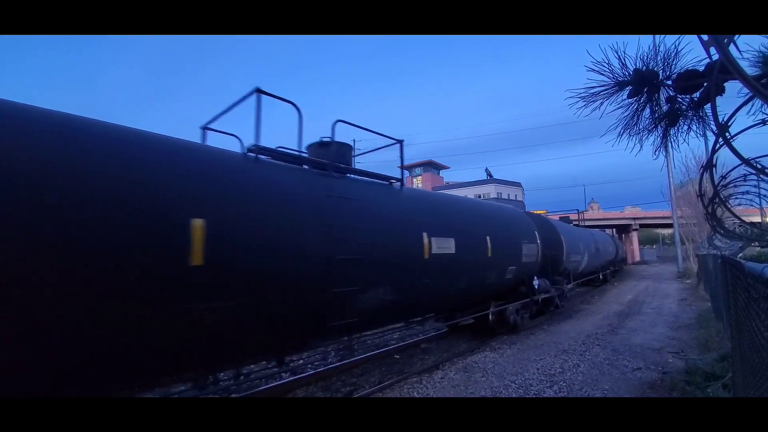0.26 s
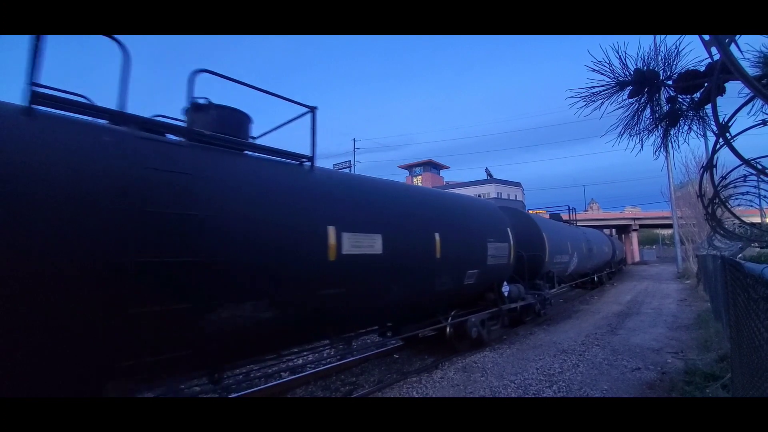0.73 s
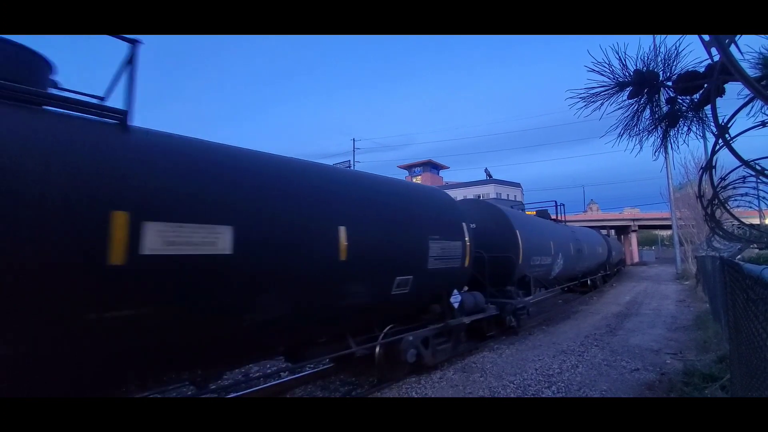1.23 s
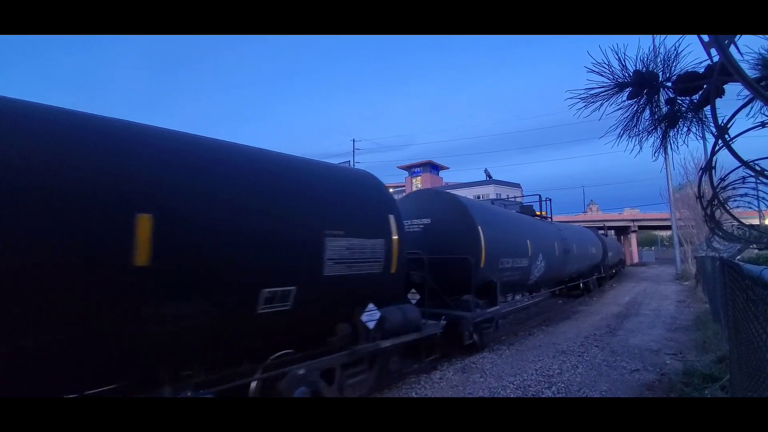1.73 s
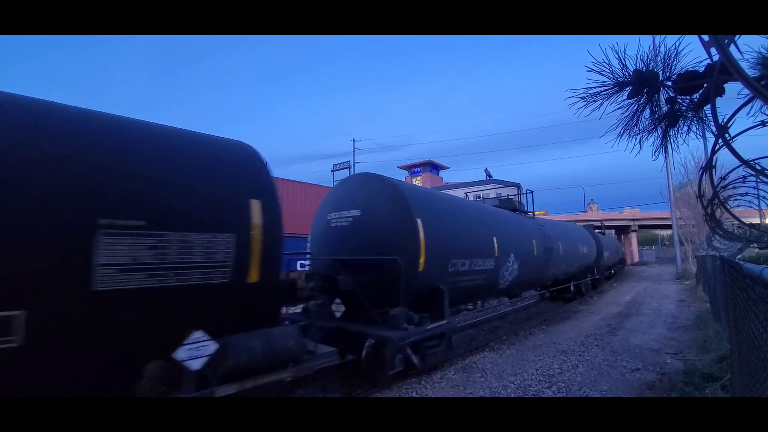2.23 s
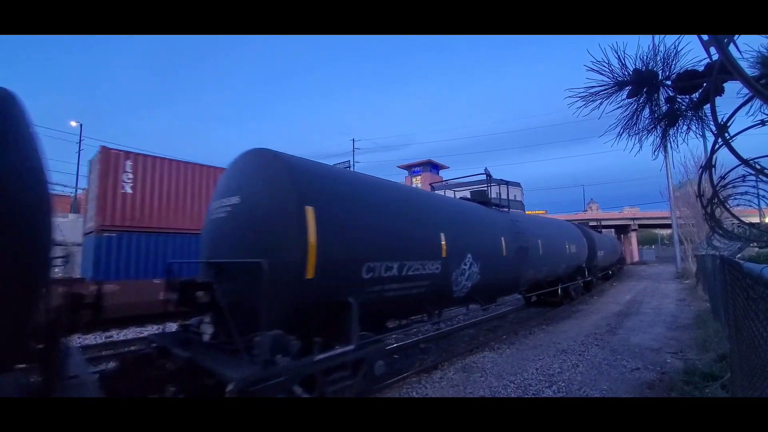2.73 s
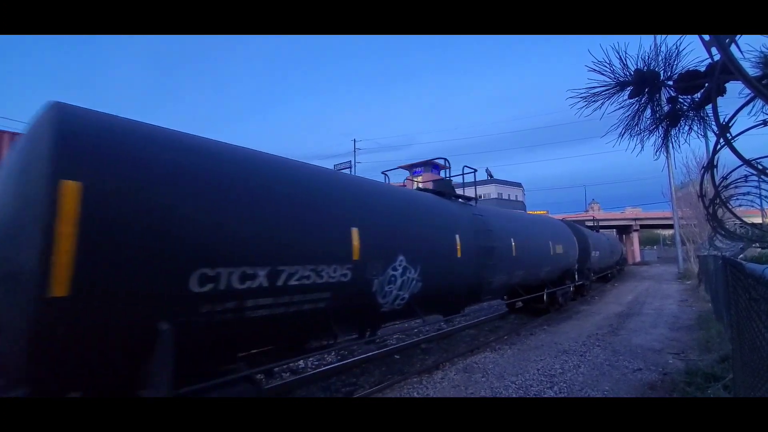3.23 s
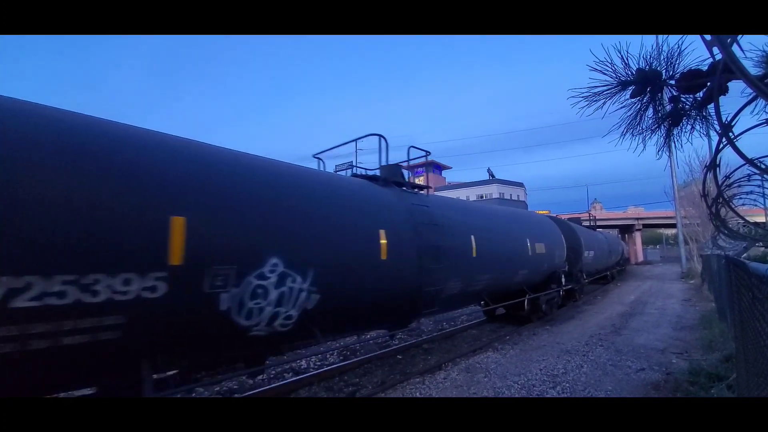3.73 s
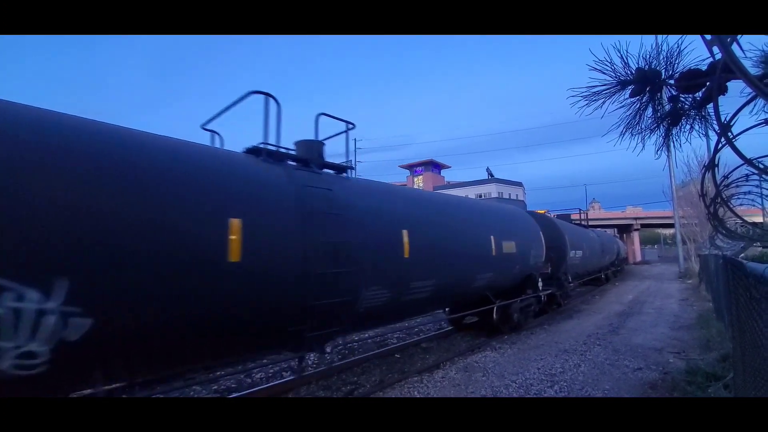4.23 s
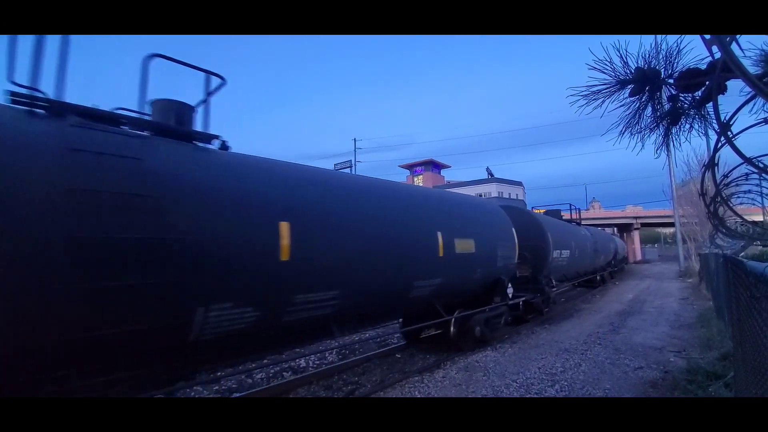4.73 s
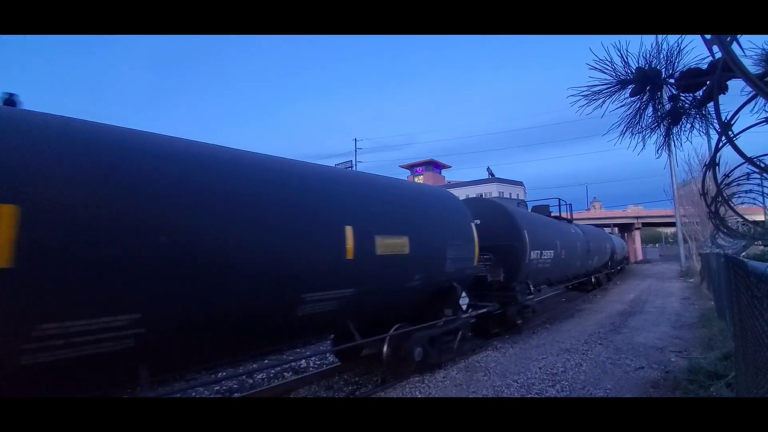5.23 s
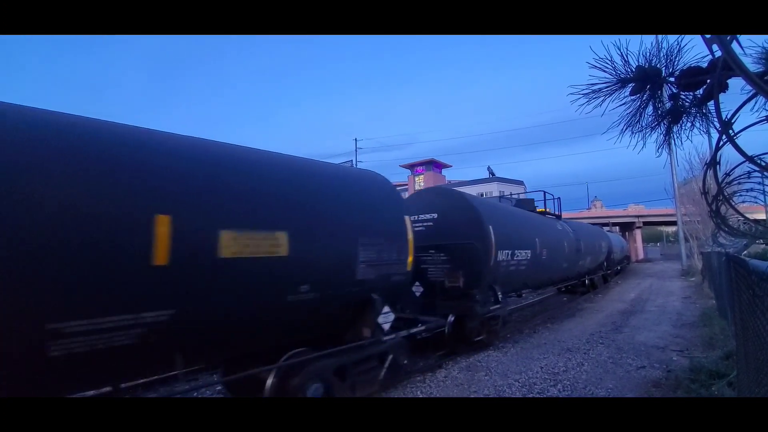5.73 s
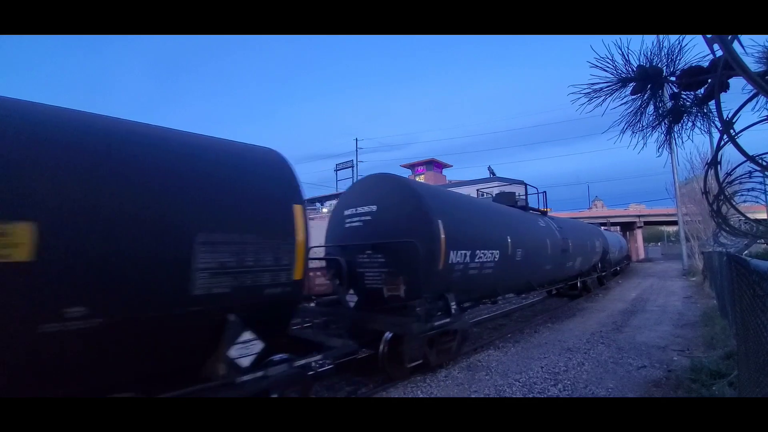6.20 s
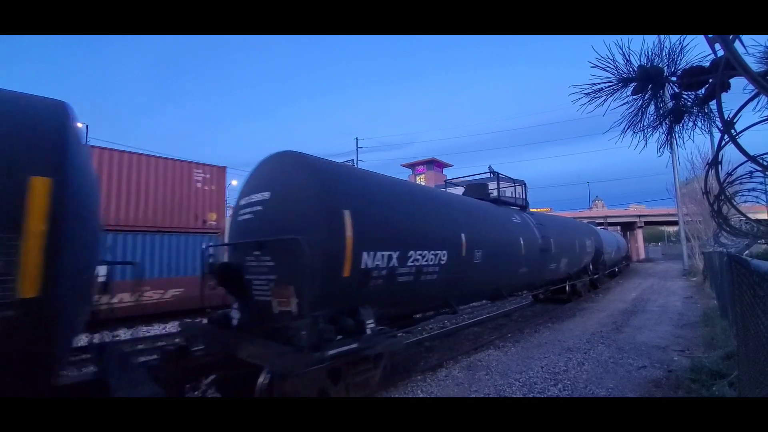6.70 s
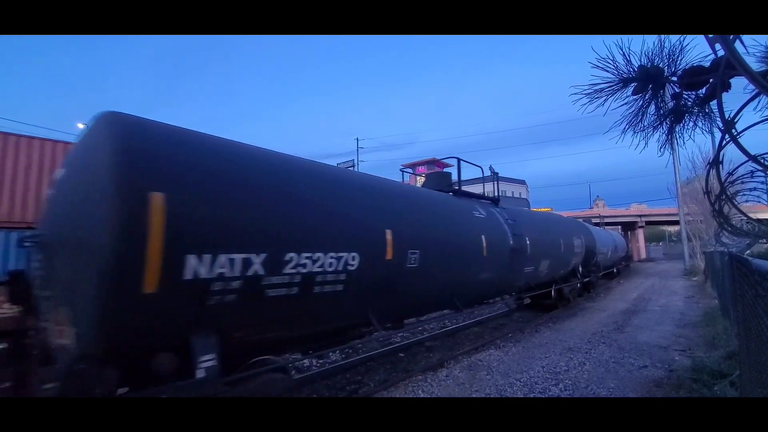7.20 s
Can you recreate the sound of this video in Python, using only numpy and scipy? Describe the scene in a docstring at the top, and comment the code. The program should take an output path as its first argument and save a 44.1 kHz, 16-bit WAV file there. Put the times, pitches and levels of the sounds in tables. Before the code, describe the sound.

Outdoors, a few metres from the track, a small stereo microphone pair hears slow, heavy tank cars rolling by without a break. It opens with low ground rumble, moderate airy steel hiss and faint wheel ringing. Thudding surges of rumble gather around 0.8-1.1 s and again near 2 s. The hiss and rail roar swell to about 1.7 s, while a very thin, extremely high flange squeal wavers and flutters from about 1 to 3.5 s, broken by tiny dips. Dull, short knocks in the running gear land irregularly, notably near 1.1, 1.3 and 2.7 s, with a softer cluster from 3.4 to 4.4 s. The sound eases around 4-4.7 s, then a second bright swell peaks near 5.4 s with a knock and rumble surge, staying strong past 6 s. Thin glassy wheel notes, sagging slightly, shimmer through the end at 7.5 s, rolling on.

```python
"""Slow tank cars at the trackside

A slow train of tank cars rolls past, 5 m from a small pair of microphones. Shaped noise makes the ground
rumble, car body boom, rail roar and steel hiss, which swell and fade as the trucks go by.
Thin wavering sines make the wheels ring on notes that sag in pitch as they pass, and one flange squeal
very high; knocks in the running gear are short rings of a few low modes."""
import sys
import numpy as np
from scipy import signal
from scipy.fft import rfft, irfft, next_fast_len
from scipy.io import wavfile
from scipy.ndimage import uniform_filter1d

SR = 44100
rng = np.random.default_rng(int(sys.argv[2]) if len(sys.argv) > 2 else 0)


def generate_wav(signal):
    """Clip the signal to [-1, 1] and save it as 16-bit WAV at the path in sys.argv[1]."""
    frames = np.transpose(np.atleast_2d(signal))
    scaled = np.clip(frames, -1, 1) * 32767
    pcm = np.round(scaled).astype(np.int16)
    wavfile.write(sys.argv[1], SR, pcm)


def ratio_of_db(decibels):
    """Turn decibels (scalar or array-like) into linear amplitude factors; 0 dB maps to 1."""
    return 10 ** (np.asarray(decibels, float) / 20)


N = 328841  # samples
FRAME, HOP = 2048, 512  # samples, short-time spectra
HZ = np.fft.rfftfreq(FRAME, 1 / SR)[:, None]
TIME = np.arange(N // HOP + 5) * HOP / SR
SPEED, DISTANCE = 4.6, 5.0  # m/s, m from the microphones to the track
LEAD = 20  # samples the left port leads in the rolling noise; half as many in rumble and knocks

# slow levels of the low layers: time_s, ground_rumble_db, body_boom_db, rail_roar_db
LOW = [(0.0, -34.5, -40, -48), (0.52, -34, -41.5, -47), (0.6, -32, -36.5, -45.5), (0.95, -29, -36, -45.5),
       (1.24, -24, -30.5, -40.5), (1.56, -24, -35.5, -39), (1.68, -29, -35.5, -43.5),
       (2.14, -30, -34.5, -42.5), (2.43, -33, -41, -46), (2.47, -33, -34.5, -43),
       (3.53, -36.5, -43.5, -49.5), (3.97, -35.5, -36, -46.5), (4.03, -35, -40, -49),
       (4.73, -33.5, -40.5, -50.5), (5.27, -35, -37, -40.5), (5.6, -34.5, -41.5, -38.5),
       (5.85, -36, -39, -43.5), (6.15, -36, -42.5, -46.5), (6.65, -41, -45.5, -52),
       (6.95, -38.5, -39.5, -49.5), (7.08, -34.5, -37, -48), (7.46, -40, -44.5, -54.5)]
# slow levels of the hiss: time_s, wheel_roar_db, tread_hiss_db, flange_hiss_db, left_over_right_db
HIGH = [(0.0, -41.5, -41, -35, 1), (0.23, -39.5, -40.5, -32, 1.5), (0.35, -37.5, -35, -33, 3.5),
        (0.66, -38.5, -37.5, -31.5, 1), (0.79, -35, -31.5, -29, 1.5), (1.26, -32.5, -29, -27, 3.5),
        (1.7, -29.5, -24.5, -25.5, 3), (2.24, -34, -30, -29.5, 1.5), (2.62, -32, -30.5, -25.5, 4),
        (2.78, -33.5, -29, -30, -1.5), (2.99, -35, -32.5, -23.5, 2.5), (3.11, -33.5, -33, -29.5, 1.5),
        (3.32, -37, -32, -28, 1.5), (3.65, -37.5, -32.5, -26, 3), (4.28, -38, -33.5, -33, 0),
        (4.67, -41, -38, -34, 2.5), (4.87, -35, -32, -30.5, 2.5), (5.07, -30, -29.5, -28.5, 3),
        (5.13, -30, -29, -26, 3.5), (5.38, -26.5, -24.5, -26, 3), (5.81, -29, -29.5, -26, 4),
        (6.11, -29, -27, -27, 3.5), (6.73, -35, -31.5, -28, 5), (6.91, -30, -28, -30, 3),
        (7.46, -36.5, -31, -26.5, 1.5)]
# when each truck passes the microphones: time_s
ABREAST = [-.5, 2.3, 3.4, 6.2, 7.3]
# lean of the microphone pair over pitch: pitch_hz, left_over_right_db
TILT = [(100, -1.5), (400, 1.4), (1800, 0), (3200, -1.5), (6500, 2.5), (7500, -0.5), (8700, -5),
        (10500, 4.5), (12500, 0.5), (15000, 13.5)]


def read(points, hz=HZ):
    """A spectrum table on a log pitch scale, constant beyond its ends."""
    f, value = np.transpose(points)
    return np.interp(np.log(hz + 1), np.log(f + 1), value)


def curves(rows):
    """The columns of a time table at each frame."""
    s, *columns = np.transpose(rows)
    return [np.interp(TIME, s, c) for c in columns]


def drift(bins, frames):
    """Random field over frequency and time in patches of the given size, rms 1."""
    field = rng.standard_normal((len(TIME), len(HZ))).T
    field = uniform_filter1d(field, max(round(bins), 1), 0)
    field = uniform_filter1d(field, max(round(frames), 1), 1)
    return field / field.std()


def doppler(abreast, t):
    """Pitch factor of a wheel that nears, passes and leaves."""
    ahead = SPEED * (abreast - t)  # m along the track
    return 1 + SPEED / 343 * ahead / np.hypot(ahead, DISTANCE)


def port_gains(hz):
    """Left and right gain of a sound that is unalike at the two ports."""
    return np.sqrt(2) * ratio_of_db(read(TILT, hz) * np.array([[.5], [-.5]]))


def waver(t, hz, width_hz, even):
    """A thin note at each port: a sine whose phase and size wander; even 1 keeps the size steady."""
    steps = np.arange(t[0], t[-1] + .02, .004)
    draws = rng.standard_normal((len(steps), 2, 2)).T
    a, b = uniform_filter1d(draws, max(round(250 / width_hz), 1), 2)
    z = uniform_filter1d(a, 3) + 1j * uniform_filter1d(b, 3)
    z = z / (abs(z) + 1e-9) ** even
    z /= np.sqrt(np.mean(abs(z) ** 2))
    z = np.array([np.interp(t, steps, port) for port in z])
    carrier = np.exp(2j * np.pi * np.cumsum(hz) / SR)
    return np.sqrt(2) * (z * carrier).real


def rolling():
    """Power of five bands of rolling noise; the treble flickers at random in wide patches."""
    # colour of each band: pitch_hz, density_db (relative, per Hz)
    body = [(82, -8), (140, -1.5), (200, -2), (263, -7), (330, -5.5), (366, -5), (420, -9), (520, -14.5),
            (680, -25.5), (1140, -120)]
    rail = [(280, -46), (480, -1), (651, -0.5), (905, -6), (981, -4.5), (1320, -8), (1500, -7), (1950, -12),
            (3300, -120)]
    wheel = [(790, -39), (1400, -14.5), (1780, -1.5), (2760, 4), (4220, 3), (4570, 1.5), (5200, 0.5),
             (6760, -15), (11400, -120)]
    tread = [(2820, -23), (4800, -3.5), (6080, -1.5), (6370, -3), (7900, -3.5), (9410, -3.5), (10300, -7.5),
             (11300, -3), (12000, 1), (22000, -120)]
    flange = [(6350, -60), (10600, -38), (11600, -7), (12400, 0.5), (13300, 5), (14200, -1), (15000, 1),
              (15600, -0.5)]
    # broad humps and dips that stay put: pitch_hz, width_hz, gain_db
    humps = [(2770, 85, 1), (3180, 150, -3.5), (3450, 50, -2), (3700, 120, -4), (3980, 80, 1.5),
             (4270, 110, -5), (4520, 60, 1), (4730, 90, -2.5), (5060, 180, -5), (5750, 90, -2.5),
             (6500, 150, 2), (7300, 120, -4), (7680, 80, -3), (8150, 150, -6), (8870, 150, -4.5),
             (10000, 200, -1), (12600, 180, 0.5), (14880, 200, 4.5)]
    # the low edge of the wheel roar waxes and wanes: time_s, gain_db
    low_edge = [(0, 0.5), (1, -1), (1.8, -2.5), (2.5, -1.5), (3.4, 2), (4.2, 3), (4.8, 0.5), (5.7, -3),
                (6.6, 4), (7.46, -2)]
    edge_hz, edge_width_hz = 1850, 330

    shapes = [ratio_of_db(read(s)) ** 2 for s in (body, rail, wheel, tread, flange)]
    levels = curves(LOW)[1:] + curves(HIGH)[:3]
    power = sum(s / s.sum() * ratio_of_db(db) ** 2 for s, db in zip(shapes, levels))
    humps_db = sum(db * np.exp(-((HZ - hz) / width) ** 2) for hz, width, db in humps)
    edge_db = curves(low_edge)[0] * np.exp(-((HZ - edge_hz) / edge_width_hz) ** 2)
    treble_flicker = np.clip(HZ / 9000, 0, 1.2) * drift(bins=170, frames=2)
    broad_flicker = np.clip(HZ / 3000, 0, 1) * drift(bins=910, frames=6)
    # narrow resonances of the scraping steel come and go
    scrape = np.clip(HZ / 2000, 0, 1) * drift(bins=2, frames=16)
    fine_db = 2.3 * scrape + 1.74 * drift(bins=5, frames=5)
    flicker_db = fine_db + 0.9 * treble_flicker + 0.72 * broad_flicker
    return power * ratio_of_db(humps_db + edge_db + flicker_db) ** 2


def faint_notes(count):
    """Power gain on the rolling noise from many weak wheel modes that all trucks share."""
    ringing = np.zeros((len(HZ), len(TIME)))
    for hz in rng.uniform(1488.0, 15400, count):
        near = slice(int(hz * .98 * FRAME / SR) - 8, int(hz * 1.02 * FRAME / SR) + 8)
        for abreast in ABREAST:
            off_hz = HZ[near] - hz * doppler(abreast, TIME)
            shape = 1 / (1 + (off_hz / 11) ** 2) ** 2
            ringing[near] += shape / shape.sum(0) * np.exp(-((TIME - abreast) / 1.03) ** 2)
    return 1 + ringing * ratio_of_db(1.5 + 3.8 * drift(bins=2.4, frames=12)) ** 2  # they flare and fade unevenly


def stray_notes(count):
    """Lesser wheel notes that come by chance, each from the truck nearest at its middle."""
    range_hz, range_s, range_db = (2000, 15400), (.15, .9), (3, 8)  # pitch, length, strength
    at, pitch, length, strength = rng.random((count, 4)).T
    middle = at * N / SR
    half = np.interp(length ** 2, (0, 1), range_s) / 2  # squared: short notes are commoner
    truck = np.take(ABREAST, abs(middle[:, None] - ABREAST).argmin(1))
    return list(zip(middle - half, middle + half, np.interp(pitch, (0, 1), range_hz),
                    np.interp(strength, (0, 1), range_db), truck))


def wheels(power):
    """Ringing notes, listed and by chance, each driven by the rolling noise around its pitch."""
    # notes that stand out, grouped by the passing time that sets their glide (a far one makes the
    # pitch nearly steady): start_s, end_s, pitch_hz (ahead of the glide),
    # level_db (over one bin of the rolling noise, ahead of a 0.5 dB trim)
    rings = [
        [(0, 1.44, 6648, 10), (.05, .7, 4030, 6.5), (0, .5, 4580, 8.5), (.5, .78, 2050, 9), (0, .15, 5540, 9),
         (0, .25, 3030, 7), (.37, .93, 8034, 12), (0, .56, 13068, 9.5), (3.2, 4.7, 9785, 12),
         (3.62, 5.2, 15042, 10.5)],
        [(1.3, 1.9, 363, 0), (1, 2, 1790, 8.5), (1.2, 1.35, 2210, 8), (2.08, 2.28, 1250, 9.5),
         (1.98, 2.15, 6130, 9), (2.08, 2.28, 366, 5), (2.45, 3, 367, 2), (1.49, 3.07, 6525, 10),
         (2.5, 4.4, 7445, 10.5), (2.4, 2.9, 7720, 11), (2.4, 3.2, 7860, 9), (2.3, 2.6, 6070, 9.5),
         (2.79, 3.34, 12882, 10.5), (.9, 1.9, 14900, 9), (2.2, 2.9, 14850, 10), (3.25, 4.83, 6528, 9),
         (6.6, 7, 1625, 10)],
        [(3.05, 3.3, 4490, 11), (3.35, 4.1, 4500, 10.5), (3.7, 3.88, 968, 3), (2.4, 3.5, 3935, 8),
         (4.05, 4.25, 3950, 8), (3.2, 4.4, 5210, 7.5), (2.4, 4, 6850, 7.5), (3.6, 3.85, 2735, 7),
         (4, 4.5, 3330, 8), (2.37, 3.95, 8334, 13.5), (2.93, 4.5, 14850, 11), (3.1, 3.9, 14930, 9),
         (3.15, 4, 13740, 10), (3.1, 4.25, 12714, 12), (3.25, 4.05, 15480, 13), (2.04, 3.62, 14118, 7.5)],
        [(4.27, 5.85, 14844, 10.5), (5.1, 5.5, 1830, 10), (5.6, 6.05, 1800, 10), (6.3, 6.52, 1560, 11),
         (6.3, 6.5, 1750, 9), (6.25, 7.1, 3335, 9), (5.5, 6.9, 5450, 7.5), (6.3, 6.65, 2740, 9.5),
         (5.3, 6, 366, 2), (4.5, 5.4, 7400, 9.5), (6, 6.8, 7410, 11), (4.3, 5, 11900, 13),
         (4.4, 5.8, 12460, 11), (4.4, 5.6, 11230, 9), (4.7, 5.3, 4510, 10.5), (5.4, 5.95, 4515, 11),
         (5.1, 5.6, 2690, 8.5), (5.7, 5.9, 1585, 8), (5.62, 5.75, 3525, 13), (5.65, 5.85, 965, 2),
         (5.08, 5.22, 740, 2), (5.7, 6.5, 9335, 9), (5.2, 6, 12975, 8.5), (6, 6.8, 13870, 9),
         (6.45, 6.85, 12230, 11), (6.4, 6.9, 9850, 9.5), (6.4, 6.9, 7950, 9.5), (5.02, 6.04, 14166, 8.5),
         (5.11, 6.69, 8352, 11), (4.9, 5.7, 11676, 10), (5.76, 6.78, 15168, 9.5), (6.1, 6.3, 4000, 11),
         (6.75, 7.12, 3995, 14.5), (5.7, 6.4, 8405, 14), (6.4, 7.46, 8385, 12.5), (5.85, 6.87, 11975, 11),
         (6.04, 6.59, 6420, 11.5), (6.04, 7.43, 14874, 10.5), (6.13, 6.69, 14730, 10), (6.1, 6.87, 10840, 13),
         (6.3, 6.55, 2200, 10), (6.8, 7.4, 2200, 8)],
        [(6.07, 6.3, 4478, 16.5), (6.64, 6.9, 4490, 17.5), (6.95, 7.17, 4498, 15), (6.8, 7, 2700, 12),
         (6.95, 7.4, 3125, 9.5), (6.85, 7.46, 13278, 13), (7.15, 7.46, 1928, 13), (6.8, 7.46, 3815, 9),
         (7.1, 7.46, 6000, 9.5), (7.15, 7.46, 8950, 9.5), (6.9, 7.46, 15470, 10), (6.3, 6.45, 2610, 11),
         (7.06, 7.46, 13590, 13), (7, 7.46, 14700, 15.5)],
    ]
    out = np.zeros((2, N))
    listed = [(*note, abreast) for abreast, notes in zip(ABREAST, rings) for note in notes]
    for start, end, hz, db, abreast in listed + stray_notes(count=100):
        # .06 s more at each end for the fades
        at = np.arange(max(int((start - .06) * SR), 0), min(int((end + .06) * SR), N))
        t = at / SR
        k = round(hz * FRAME / SR)
        nearby = power[k - 8:k + 9].mean(0)
        drive = np.sqrt(np.interp(t, TIME, uniform_filter1d(nearby, size=15)))
        tone = waver(t, hz * doppler(abreast, t), 7 + .001 * hz, even=0.8)
        tone = tone[[0, 0]] if hz < 1000 else tone  # low notes are alike at both ports
        fade = signal.windows.tukey(len(t), .25)
        out[:, at] += tone * drive * fade * ratio_of_db(db - 0.5) * port_gains(hz)
    return out


def squeal():
    """One flange sings: through the air it sags in pitch, through the rail it holds; air has a noisy skirt."""
    # slow level: time_s, level_db (ahead of a 1 dB lift)
    squeal_level = [(0, -41), (.65, -45), (1, -30.5), (1.3, -22), (1.55, -26), (1.8, -29), (2.1, -25.5),
                    (2.35, -25), (2.52, -28), (2.65, -23.5), (2.78, -31.5), (2.95, -28.5), (3.15, -31.5),
                    (3.5, -35), (3.9, -42), (4.2, -46)]
    # place between the ports: time_s, left_over_right_db
    squeal_pan = [(0, 2), (1.3, -1), (1.5, 3), (2.3, 1.5), (2.5, 5), (2.66, 10), (2.9, 7), (3.1, 2),
                  (4.2, 11)]
    # brief dips in the squeal's level, and one brief rise: time_s, change_db
    dips = [(1.1, -9), (1.36, -6), (1.59, -5), (1.73, -16), (1.82, -9), (1.91, -7), (1.98, -14),
            (2.42, -12), (2.6, -13), (2.75, -5), (3.12, 5), (3.42, -8)]
    # part of the power that comes along the rail: time_s, share (0-1)
    rail_share = [(0, .5), (1.1, .4), (1.3, .6), (1.7, .45), (2, .05), (3.1, .03), (3.4, .6), (4.2, .6)]
    dip_s = 0.011  # half length of a dip

    t = np.arange(int(squeal_level[-1][0] * SR)) / SR
    share = np.interp(t, *np.transpose(rail_share))
    air_hz = 11942 * doppler(ABREAST[1], t)
    air = waver(t, air_hz, 26, even=0.8)  # echoes off the cars make it unalike at the ports
    rail = waver(t, 11938 + 0 * t, 28, even=0.65)
    skirt = sum(waver(t, air_hz + off_hz, 120, even=0) for off_hz in (-110, -30, 60))
    sound = np.sqrt(1 - share) * air + np.sqrt(share) * rail + ratio_of_db(-12.5) * skirt
    throb_db = 1.0 * waver(t, 11.3 + 0 * t, 21.0, even=0.15)[0]  # uneven throb at about 11.3 Hz
    sound *= ratio_of_db(np.interp(t, *np.transpose(squeal_level)) + throb_db + 1.0)
    sound *= ratio_of_db(sum(db * np.exp(-((t - s) / dip_s) ** 2) for s, db in dips))
    pan_db = np.interp(t, *np.transpose(squeal_pan))
    sound *= ratio_of_db(pan_db * np.array([[.5], [-.5]])) * np.sqrt(2)
    return np.pad(sound, ((0, 0), (0, N - len(t))))


def surges(t):
    """Amplitude of the rumble's surges: half a bell on either side of each peak, the fall slower."""
    # surges of the ground: time_s, peak_db
    surge_peaks = [(.3, -28.5), (.78, -21.5), (.87, -22), (1.05, -21), (1.11, -18), (1.33, -35), (1.6, -31),
                   (1.86, -23), (2.14, -22), (2.24, -25.5), (2.97, -28.5), (3.03, -26.5), (3.09, -28),
                   (3.23, -29), (3.63, -30), (4.15, -29), (5.19, -27.5), (5.35, -21.5), (5.86, -32),
                   (6.9, -38), (7.41, -30.5)]
    s, db = np.transpose(surge_peaks)[:, :, None]
    width = np.where(t < s, 0.014, 0.022)  # s, rise and fall
    return (ratio_of_db(db) * np.exp(-((t - s) / width) ** 2 / 2)).max(0)


def rumble():
    """The ground hums more evenly than plain noise, almost alike at both ports."""
    # colour of the rumble: pitch_hz, density_db (relative, per Hz)
    rumble_colour = [(12, -50), (20, -49), (55, -5), (75, -3), (94, -3.5), (141, -14), (170, -19),
                     (220, -20), (370, -120)]
    size = next_fast_len(N + LEAD)
    colour = ratio_of_db(read(rumble_colour, np.fft.rfftfreq(size, 1 / SR)))
    hum, other = signal.hilbert(irfft(rfft(rng.standard_normal((2, size))) * colour, size))
    hum = (hum / abs(hum) ** .55).real  # evens out the beats
    hum = irfft(rfft(hum) * (colour / (colour + 0.51)), size)  # back inside the band
    hum = hum / hum.std()
    other = ratio_of_db(-22.5) * other.real / other.real.std()  # the part that is opposite at the ports
    ports = np.array([(hum + other)[LEAD // 2:][:N], (hum - other)[:N]]) * ratio_of_db([[-.25], [.25]])
    t = np.arange(N) / SR
    lumps_db = 1.5 * waver(t, 14 + 0 * t, 30, even=0.95)[0]  # uneven lumps at about 14 Hz
    slow_db = np.interp(t, TIME, curves(LOW)[0]) + lumps_db
    return ports * np.maximum(ratio_of_db(slow_db), np.interp(t, TIME, surges(TIME)))


def knocks():
    """Dull knocks in the running gear: each rings the same few low modes, a little detuned."""
    # the knocks: time_s, peak_db (ahead of the pan gains), left_over_right_db
    knock_list = [(0.738, -44, -5), (0.812, -33, -3), (1.061, -27, 1.5), (1.334, -25, -4), (1.808, -49, 1),
                  (2.333, -33, 3), (2.644, -41, -11), (2.74, -23.5, 0), (2.999, -35, 0), (3.404, -31, 0.5),
                  (3.801, -33.5, 4), (3.923, -30, 4.5), (4.094, -32, 3), (4.146, -40, 0), (4.338, -34, -2),
                  (4.448, -37, 6), (5.18, -43, 8), (5.28, -26.5, 1), (7.052, -39, -2)]
    # modes of the running gear: pitch_hz (ahead of detuning), level_db, t60_s
    knock_modes = [(215, -4, 0.039), (333, 0.5, 0.027), (366, -9, 0.07), (575, -8, 0.031),
                   (980, -16, 0.015), (1500, -18, 0.012)]
    out = np.zeros((2, N + SR))
    t = np.arange(SR // 4) / SR
    chance = rng.random((len(knock_list), len(knock_modes), 2))
    for (s, db, pan_db), draw in zip(knock_list, chance):
        ring = np.zeros(len(t))
        for (hz, mode_db, t60), (a, b) in zip(knock_modes, draw):
            detuned_hz = hz * (0.997 + 0.076 * a)
            ring += ratio_of_db(mode_db - 60 * t / t60) * np.sin(2 * np.pi * (detuned_hz * t + b))
        ring *= 1 - np.exp(-t / 0.001)  # soft onset
        ring *= ratio_of_db(db) / abs(ring).max()
        for port, late in enumerate((0, LEAD // 2)):
            out[port, int(s * SR) + late:][:len(t)] += ring * ratio_of_db(pan_db * (1.5 - port))
    return out[:, :N]


def scene():
    """Random short-time spectra carry the rolling noise to two partly alike ports; the rest is added."""
    # likeness of the two ports: pitch_hz, likeness (0-1)
    likeness = [(60, 0.93), (150, 0.96), (300, 0.78), (600, 0.78), (900, 0.71), (1600, 0.28), (2500, 0.39),
                (3200, 0.2), (8000, 0.29), (15000, 0.062)]
    # how far the housing holds the left port back: pitch_hz, phase_rad
    shade = [(60, 0.82), (400, 0.44), (1000, 1), (2300, 0.63), (3300, 0.43)]
    noise = rolling()
    power = noise * faint_notes(count=110)
    a, b, c, d = rng.standard_normal((len(TIME), len(HZ), 4)).T
    same = read(likeness)
    phase = 2 * np.pi * HZ * LEAD / SR - read(shade)
    right = a + 1j * b
    left = (same * right + np.sqrt(1 - same ** 2) * (c + 1j * d)) * np.exp(1j * phase)
    # the hiss leans as trucks pass; at 2 dB left over right the tilt alone acts
    tilt_db = read(TILT) + np.clip(HZ / 4000, 0, 1) * (curves(HIGH)[3] - 2)
    z = np.array([left * ratio_of_db(tilt_db / 2), right / ratio_of_db(tilt_db / 2)])
    z *= np.sqrt(2 * power / (1 + same * np.cos(phase)))  # levels hold for the mean of both ports
    out = signal.istft(z, nperseg=FRAME, noverlap=FRAME - HOP)[1][:, :N]
    out *= np.sqrt(power.sum(0).mean() / np.mean(out.mean(0) ** 2))
    return out + wheels(noise) + squeal() + rumble() + knocks()


def low_pass(x):
    """Removes everything above the highest recorded frequency."""
    return signal.sosfilt(signal.butter(12, 16670, fs=SR, output="sos"), x)


def record(dry):
    """A steep low-pass at 15.5 kHz limits the band of the microphone pair."""
    edge = signal.firwin(1023, 15500, window=("kaiser", 9), fs=SR)
    limited = signal.oaconvolve(dry, edge[None], "same")
    return low_pass(limited)


dry = scene()
out = record(dry)
generate_wav(out)
```